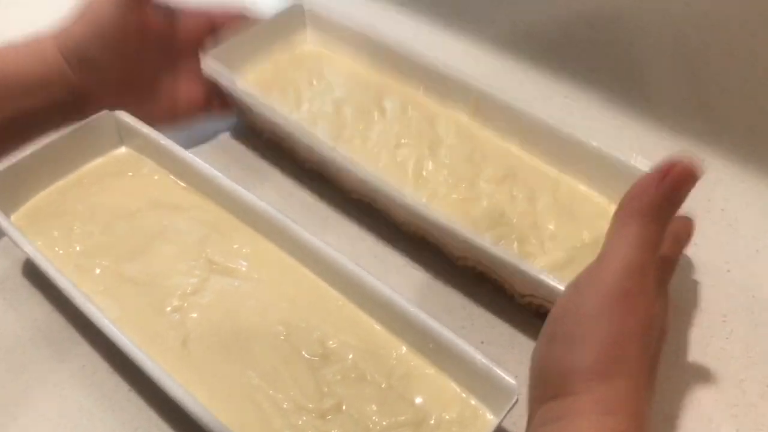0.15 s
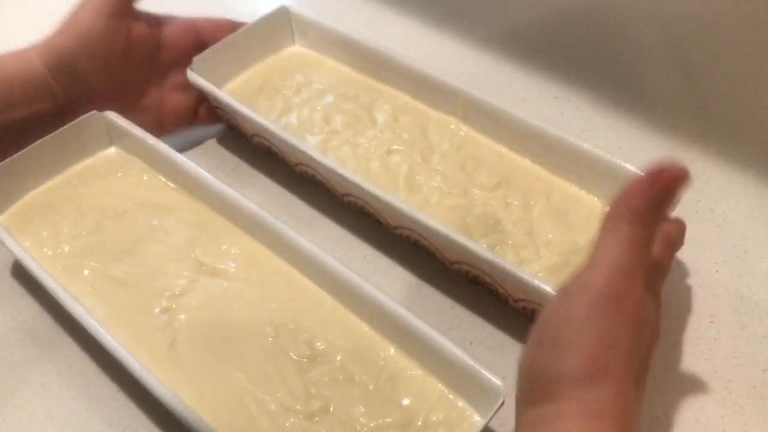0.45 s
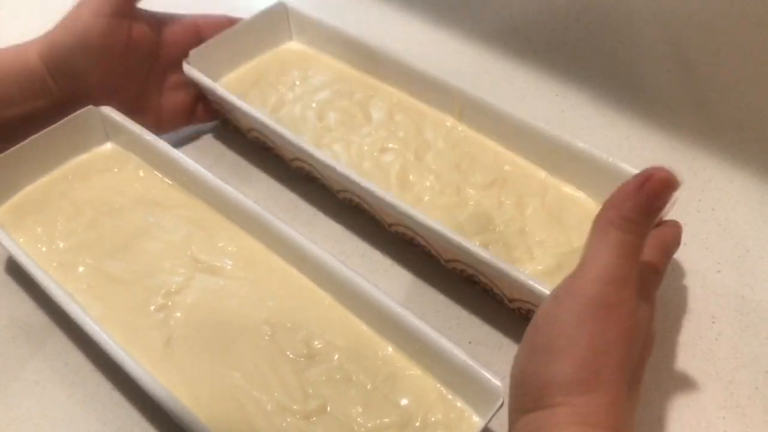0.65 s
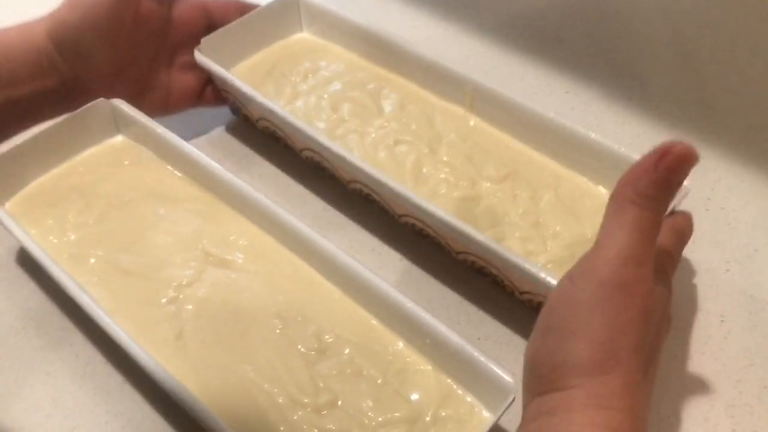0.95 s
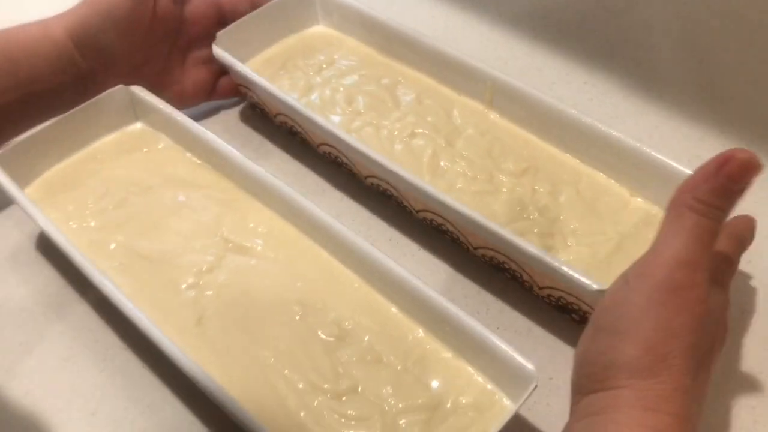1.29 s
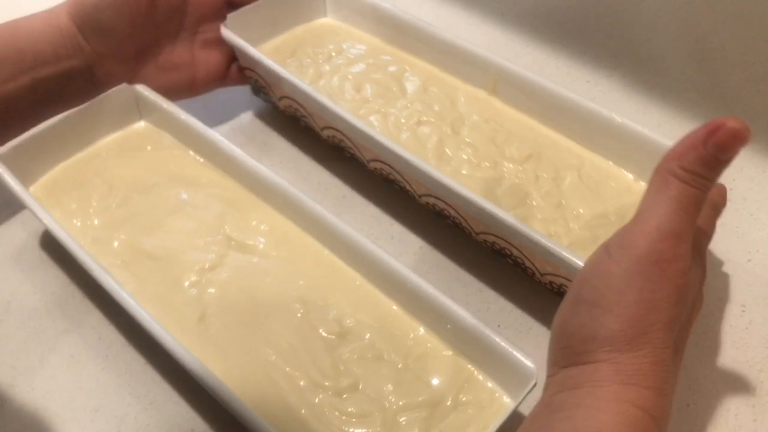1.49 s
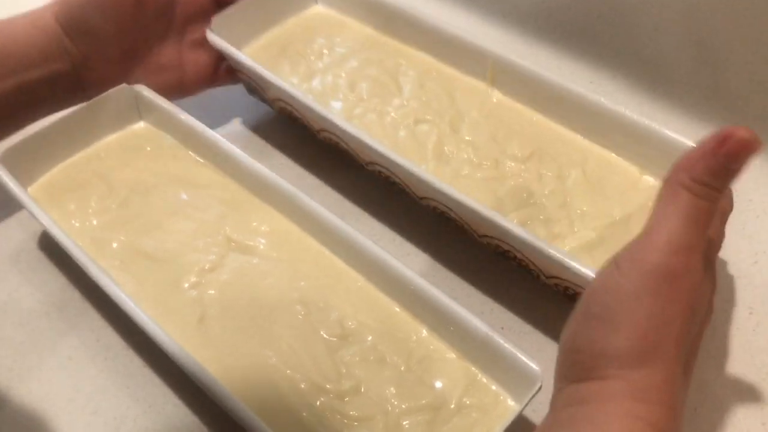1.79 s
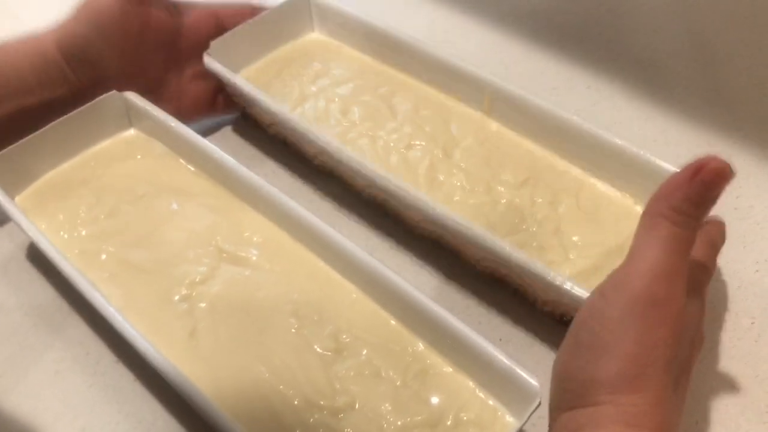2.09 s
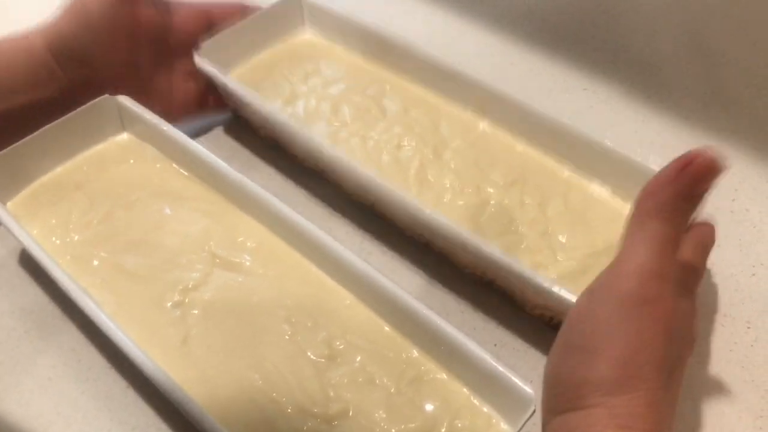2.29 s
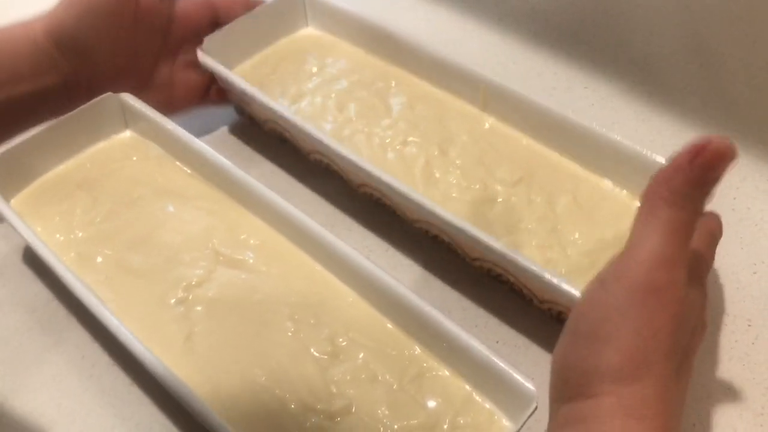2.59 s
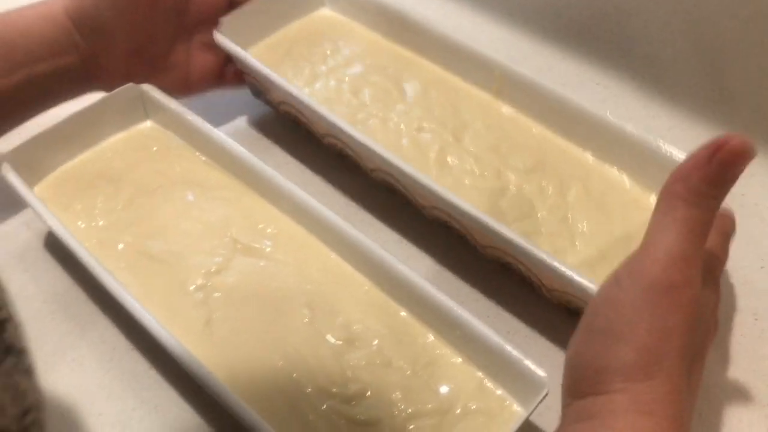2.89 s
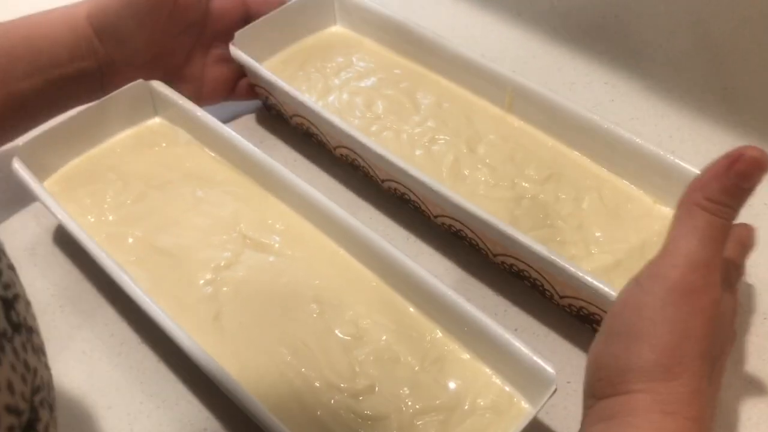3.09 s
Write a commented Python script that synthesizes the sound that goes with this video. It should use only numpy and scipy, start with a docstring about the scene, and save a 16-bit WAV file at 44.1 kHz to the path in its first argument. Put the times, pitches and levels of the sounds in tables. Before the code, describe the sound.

A loaf pan of batter knocks on a kitchen counter five times, then seven more.

```python
"""A loaf pan full of batter is tapped on a kitchen counter: five knocks, a pause, then seven more.
In each knock one edge touches first and the base slaps down a few milliseconds later.
The pan clatters and rings, but the batter hushes it at once; now and then a corner snaps.
Fingers shift softly on the pan, mostly in the pause.
The small room echoes and booms briefly, and an appliance hums throughout."""
import sys
import numpy as np
from scipy import signal
from scipy.io import wavfile

SR = 44100
rng = np.random.default_rng(int(sys.argv[2]) if len(sys.argv) > 2 else 0)


def generate_wav(sig):
    """Save sig (samples, or channels by samples) to the path in sys.argv[1] as 16-bit PCM at SR."""
    pcm = np.round(np.clip(np.atleast_2d(sig).T, -1, 1) * 32767).astype(np.int16)
    wavfile.write(sys.argv[1], SR, pcm)


N = 143325
TIME = np.arange(N) / SR
BAND_EDGES = np.geomspace(25, 17000, 35)  # narrow slices of pitch, bass to treble [Hz]
BAND_HZ = np.sqrt(BAND_EDGES[1:] * BAND_EDGES[:-1])


def from_db(db):
    """Turn decibels into a number to multiply a sound by."""
    return 10 ** (np.asarray(db) / 20)


def fading_tone(t, hz, db, fade_s):
    """A pure note dying away. A fade time is always the time taken to drop 60 dB."""
    return np.sin(2 * np.pi * hz * t) * from_db(db - 60 * t / fade_s)


def add(out, time_s, sound):
    """Mix a sound in at the given time."""
    start = int(time_s * SR)
    out[start:start + len(sound)] += sound[:N - start]


def split(*sounds):
    """Cut sound into narrow pitch bands, taking each from the given sounds in turn."""
    filters = [signal.butter(2, edges, "band", fs=SR, output="sos")
               for edges in zip(BAND_EDGES, BAND_EDGES[1:])]
    return np.array([signal.sosfilt(f, sounds[k % len(sounds)] + 1e-18) for k, f in enumerate(filters)])


def noise_bands():
    """Even hiss cut into bands, each unrelated to its neighbours."""
    return split(*rng.standard_normal((2, N + SR)))[:, SR:]


def per_band(table, column=1):
    """Read one column of a table at the middle pitch of every band."""
    table = np.array(table)
    return np.interp(np.log(BAND_HZ), np.log(table[:, 0]), table[:, column])[:, None]


def band_gains(tone):
    """How far to turn up each noise band to get this tone at an overall strength of 1."""
    gain = from_db(per_band(tone))
    return gain / np.sqrt(np.sum(gain[:, 0] ** 2 * np.diff(BAND_EDGES)) * 2 / SR)


# The soft rush of the room: (pitch [Hz], relative level [dB])
ROOM_TONE = [(25, -29), (50, -14), (85, -17), (140, -9), (220, -24), (300, -17), (380, -31.5), (500, -21),
             (700, -30), (1200, -35.5), (2000, -39.5), (3500, -41.5), (8000, -52), (16000, -60.5)]


def appliance_hum(motor_hz=58.4, motor_db=-35.5, mains_hz=120.1, mains_db=-48, air_db=-47.5):
    """A motor throbs slowly over a steady electrical hum and the soft rush of the room."""
    motor, mains = (np.sqrt(2) * np.sin(2 * np.pi * (hz * TIME + rng.random()))
                    for hz in (motor_hz, mains_hz))
    throb_db = 2.3 * np.cos(2 * np.pi * 3.48 * (TIME - 0.015))  # 3.48 swells a second
    air = np.sum(band_gains(ROOM_TONE) * noise_bands(), axis=0)
    return from_db(motor_db + throb_db) * motor + from_db(mains_db) * mains + from_db(air_db) * air


def burst(bands, envelope):
    """Shape noise with a loudness curve, so that chance makes no band too loud or too soft."""
    sound = bands * envelope
    expected_energy = np.sum(envelope ** 2, axis=-1) * np.diff(BAND_EDGES) * 2 / SR
    return sound * np.sqrt(expected_energy / (np.sum(sound ** 2, axis=-1) + 1e-20))[:, None]


# The tone of the edge touching and of the base landing: (pitch [Hz], relative level [dB])
EDGE_TONE = [(100, -13), (300, -16), (450, -5.5), (750, 1), (1200, 1), (1700, -6), (2300, -14), (3300, -9),
             (6000, -15.5), (9000, -21), (15000, -25)]
BASE_TONE = [(100, -5), (300, -2.5), (450, -7.5), (750, -4.5), (1200, 2.5), (1700, -2.5), (2200, -6.5),
             (3200, -5), (5500, -9), (7500, -12), (9000, -13.5), (10500, -19), (15000, -29)]
# How long the clatter lasts: (pitch [Hz], fade time [s])
CLATTER_FADES = [(120, 0.079), (400, 0.065), (1200, 0.039), (3500, 0.033), (12000, .022)]
# One row a knock; a boost turns that part up or down: (edge time [s], edge boost [dB],
# base time [s], base boost [dB], thud boost [dB], hollow note boost [dB], brightness boost [dB],
# crack boost [dB], clack pitch [Hz], clack boost [dB])
KNOCKS = [ (.2076, 3.5, 0.2148, 0.5, -2.5, 2.5, 1, -0.5, 1607, 4),
          (0.4507, -1, 0.46, -1.5, 1, -5.5, 1, -1, 1710, 2.5),
          (0.679, -5.5, .6834, -0.5, 3, 3, -2, -1.5, 1212, 2.5),
          (0.895, -3, .9028, -2, 0, -3.5, 0, -4, 1399, -2.5),
          (1.0986, -7.5, 1.1088, -1, -2.5, -5, -4, -6.5, 1420, -8),
          (1.6766, -4, 1.684, -3, 1.5, 1, -3.5, 0.5, 1120, 1.5),
          (1.9084, -4, 1.9140, -2.5, 4, -1, -6.5, -5.5, 815, -3),
          (2.1294, -5.5, 2.139, -3, 4.5, -14, 0.5, 5, 1756, 3.5),
          (2.3396, -4.5, 2.3426, -1, 0, 0.5, 0.5, -5.5, 983, 2),
          (2.5550, -3.5, 2.5596, -2, 3.5, -0.5, -1, -3, 860, -0.5),
          (2.753, -11, 2.7568, -6, 2, -2, -6, -11, 1010, -3),
          (2.9690, 1, 2.9754, -2, -1, 2.5, -1.5, -4.5, 1278, 0)]


def clatter():
    """Edge, then base: each hit shakes pan and counter at many pitches, and the highest die first."""
    out, bands, t = np.zeros(N), noise_bands(), TIME[:SR // 8]
    fade = from_db(-60 * t / per_band(CLATTER_FADES))
    for edge_s, edge_db, base_s, base_db, thud_db, _, bright_db, crack_db, _, _ in KNOCKS:
        colour = from_db(per_band([(250, thud_db), (1000, 0), (3000, bright_db), (9000, crack_db)]))
        edge = (edge_s, edge_db - 9.5, EDGE_TONE, 0.00053)
        base = (base_s, base_db - 5, BASE_TONE, 0.00075)
        for time_s, db, tone, rise_s in (edge, base):
            start = int(time_s * SR)
            hit = burst(bands[:, start:start + len(t)], fade * np.minimum(t / rise_s, 1))
            add(out, time_s, from_db(db) * np.sum(colour * band_gains(tone) * hit, axis=0))
    return out


# The notes that pan and counter ring with: (pitch [Hz], relative level [dB], fade time [s])
PAN_NOTES = [(144.5, -13.5, 0.12), (215, -31, 0.041), (327.6, -19.5, 0.077), (858, -14.5, 0.039),
             (1144.5, -9, 0.057), (1247, -13, 0.039), (1448, -21, 0.14), (1570, -12, .05), (2960, -18, .05),
             (3183, -19, 0.04), (3987, -17.5, 0.056), (6090, -26, 0.051)]


def pan_ring(notes_db=-7.5, spread_db=0.5):
    """The edge clacks at a pitch set by how the pan lands; then the base sets the pan's notes ringing."""
    out, t = np.zeros(N), TIME[:SR // 4]
    hz, db, fade_s = np.array(PAN_NOTES).T[:, :, None]
    notes = fading_tone(t, hz, db, fade_s)
    notes[1::2] *= -1  # every other note starts by swinging the opposite way
    hollow_note = fading_tone(t, hz=568, db=-12, fade_s=0.07)
    for edge_s, _, base_s, base_db, _, hollow_db, _, _, clack_hz, clack_db in KNOCKS:
        add(out, edge_s, fading_tone(t, clack_hz, clack_db - 14.5, fade_s=0.07))
        strengths = from_db(notes_db + base_db + spread_db * rng.standard_normal(len(hz)))
        add(out, base_s, strengths @ notes)
        add(out, base_s, from_db(hollow_db) * hollow_note)
    return out


# The kitchen's echo: (pitch [Hz], level compared with the pan [dB], fade time [s])
ECHO = [(70, -28, .4), (130, -13, .5), (200, -13, .4), (323, -13, 0.404), (430, -19.5, 0.25),
        (579.4, -12.5, 0.39), (955, -21.5, 0.37), (1520, -17, 0.4), (2500, -16.5, 0.349),
        (6000, -16.5, 0.33), (9000, -18, .3), (14940, -20, 0.19)]


def kitchen_echo(sound, build_s=0.0062):
    """The room stores the energy of each band and lets it die away as a wash of noise."""
    energy = split(sound) ** 2
    build = np.exp(-1 / (build_s * SR))
    kept_per_sample = from_db(-60 / (per_band(ECHO, column=2)[:, 0] * SR)) ** 2
    stored = np.array([signal.lfilter([(1 - kept) * (1 - build)], [1, -kept - build, kept * build], band)
                       for kept, band in zip(kept_per_sample, energy)])
    density = stored * SR / (2 * np.diff(BAND_EDGES)[:, None])  # allow for each band's width
    return np.sum(from_db(per_band(ECHO)) * np.sqrt(np.abs(density)) * noise_bands(), axis=0)


# The room's own deep notes: (pitch [Hz], relative level [dB], fade time [s])
ROOM_NOTES = [(124.1, -37.5, 0.73), (134.6, -34, 0.57)]


def room_boom():
    """After each thud, sound caught between the walls rings at two close pitches that wobble together."""
    out, t = np.zeros(N), TIME[:SR]
    boom = sum(fading_tone(t, hz, db, fade_s) for hz, db, fade_s in ROOM_NOTES)
    for _, _, base_s, base_db, thud_db, *_ in KNOCKS:
        add(out, base_s, from_db(base_db + thud_db) * boom)
    return out


# A corner lands hard: (time [s], relative level [dB])
CORNER_HITS = [(.2153, -6.5), (0.461, -5.5), (2.1385, -15), (2.975, 2.5)]


def corner_snaps(hz=8860, fade_s=0.0058, snap_db=-2, hiss_db=-5):
    """A hard-landing corner gives one high, very short note with a spit of hiss."""
    out, t = np.zeros(N), TIME[:SR // 32]
    for time_s, db in CORNER_HITS:
        hiss = from_db(hiss_db) * np.diff(rng.standard_normal(len(t) + 1)) / 2
        snap = np.sin(2 * np.pi * hz * t) + hiss
        add(out, time_s, snap * from_db(snap_db + db - 60 * t / fade_s))
    return out


# Fingers slide on the pan: (time [s], length [s], level [dB])
FINGER_SLIDES = [(1.251, 0.039, -48.5), (1.294, 0.0066, -41.5), (1.407, 0.019, -51.5), (1.474, 0.058, -49),
                 (.546, 0.0086, -45), (0.613, .006, -50.5), (2.084, .014, -54.5), (2.844, .018, -54),
                 (2.948, .014, -51.5)]
# The tone of sliding skin: (pitch [Hz], relative level [dB])
SKIN_TONE = [(300, -5.5), (1500, 0.5), (3000, -8), (4200, 3), (6000, -0.5), (9000, -6.5), (15000, -16)]


def fingers(grain_db=3):
    """Skin slipping on the pan makes short, grainy hisses."""
    pressure = np.zeros(N)
    for time_s, length_s, db in FINGER_SLIDES:
        add(pressure, time_s, from_db(db) * np.sqrt(np.hanning(int(length_s * SR))))
    grain = np.interp(TIME, TIME[::64], rng.standard_normal(len(TIME[::64])))  # fast random flicker
    hiss = np.sum(band_gains(SKIN_TONE) * noise_bands(), axis=0)
    return pressure * from_db(grain_db * grain) * hiss


def scene(lowest_hz=60):
    """The pan close by, too small to give off deep bass, with the room's echo, boom and hum."""
    pan = clatter() + pan_ring() + corner_snaps() + fingers()
    pan = signal.sosfilt(signal.butter(4, lowest_hz, "high", fs=SR, output="sos"), pan + 1e-18)
    return (pan + kitchen_echo(pan) + room_boom() + appliance_hum())[None]


def record(dry, ceiling=0.87, highest_hz=15900):
    """Round off the loudest peaks and cut the very highest treble."""
    rounded = dry / (1 + (dry / ceiling) ** 4) ** (1 / 4)
    return signal.sosfilt(signal.ellip(10, 0.1, 70, highest_hz, fs=SR, output="sos"), rounded)


dry = scene()
out = record(dry)
generate_wav(out)
```